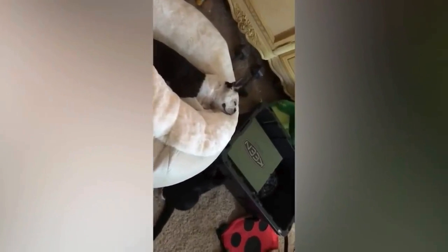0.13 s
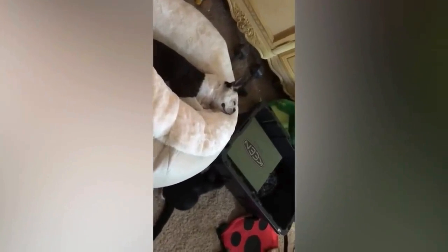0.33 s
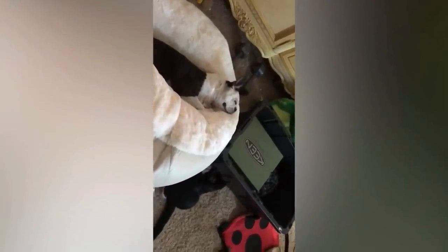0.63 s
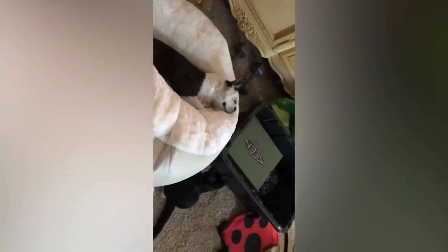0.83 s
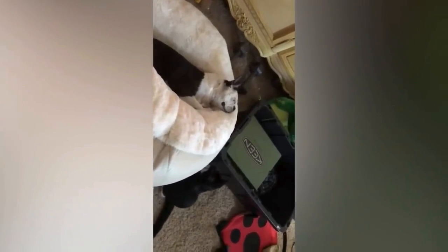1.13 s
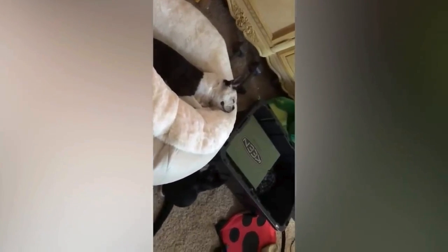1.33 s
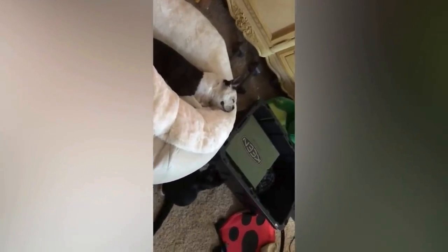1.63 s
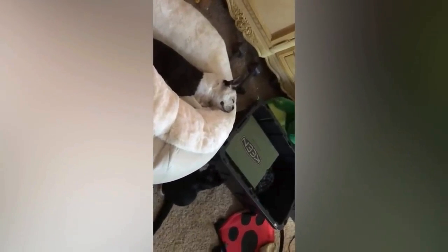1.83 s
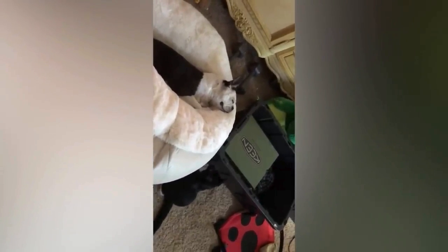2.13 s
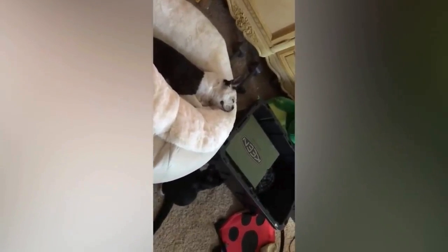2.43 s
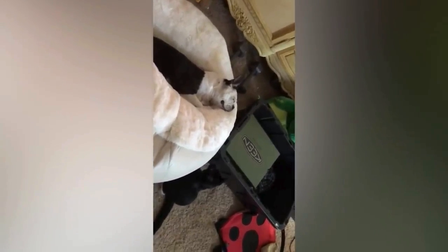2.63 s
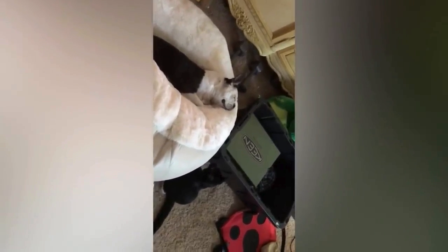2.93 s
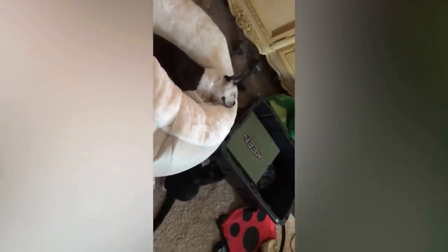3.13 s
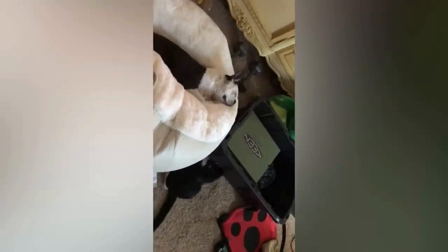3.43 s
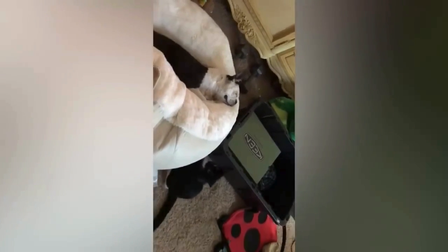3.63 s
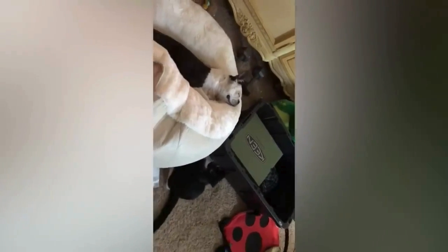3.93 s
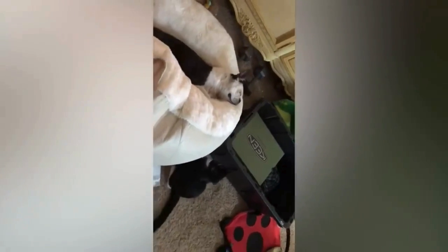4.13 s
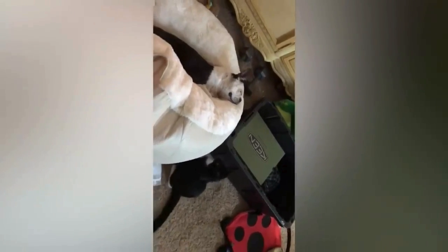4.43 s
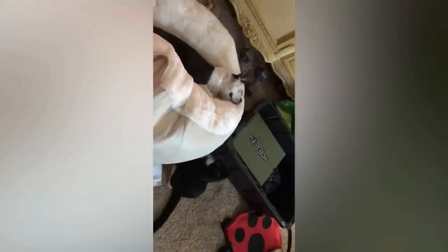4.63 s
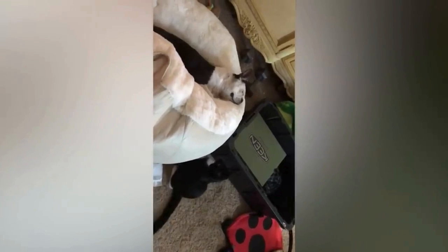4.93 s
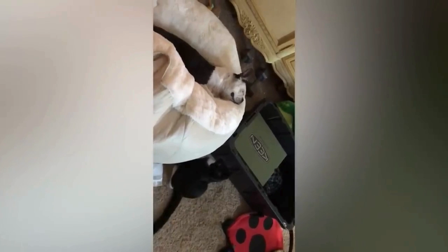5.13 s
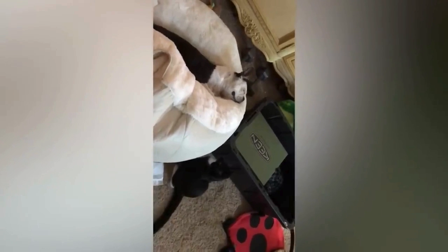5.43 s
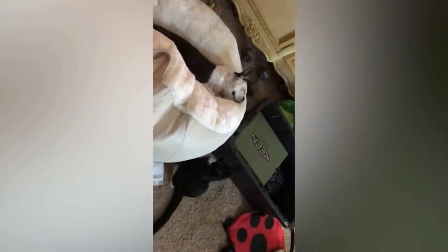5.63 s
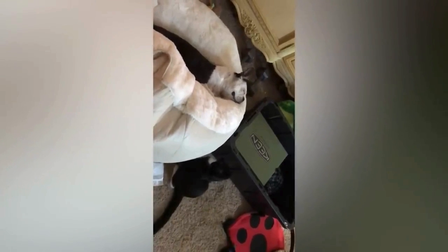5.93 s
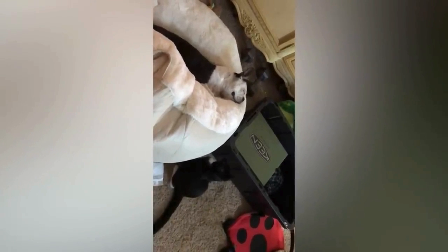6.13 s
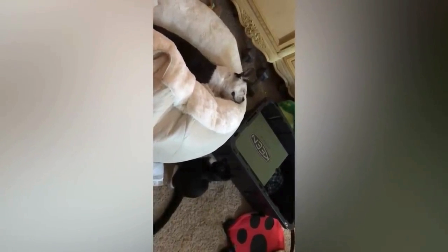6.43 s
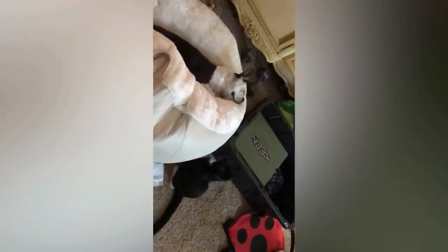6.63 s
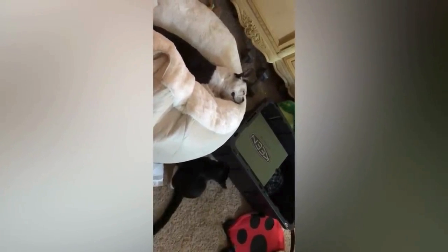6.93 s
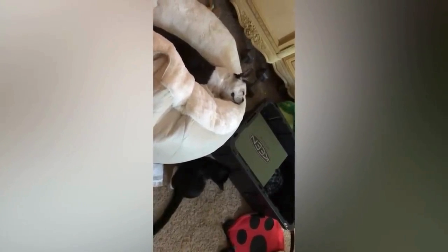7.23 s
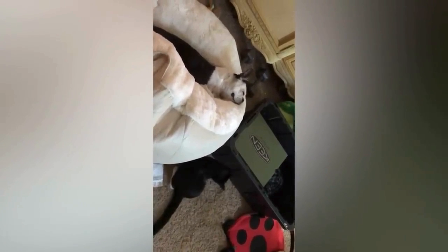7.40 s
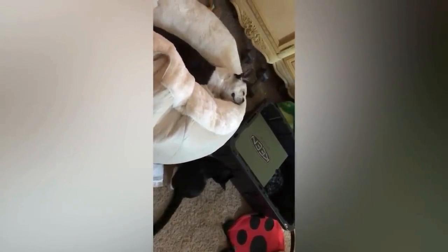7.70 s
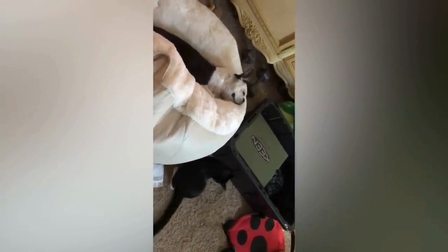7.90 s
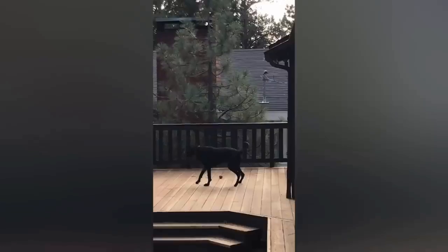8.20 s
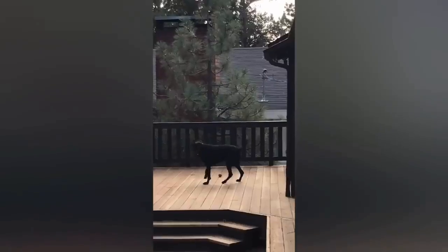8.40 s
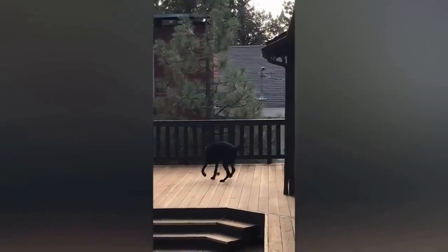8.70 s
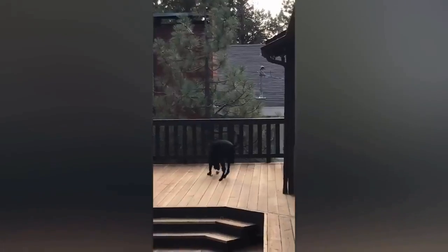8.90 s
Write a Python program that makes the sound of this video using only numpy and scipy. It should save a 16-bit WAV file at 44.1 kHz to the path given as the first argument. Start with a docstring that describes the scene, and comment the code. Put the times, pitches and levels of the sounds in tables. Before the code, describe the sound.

In a hushed room with a faint wavering hum, a little dog sleeps nearby, giving four evenly spaced snores that swell, rattle and fade. Tiny nose whistles and slight rustling come in the pauses. The last second switches abruptly outdoors, where soft gusts bump the microphone and a collar tag ticks against a distant wash of noise.

```python
"""A quiet bedroom, where a small dog snores four times. Its soft palate slaps about fifty times a
second, each slap rings the nose and throat, and air hisses through the gap. Faint nose whistles and
soft rustles fall between the snores, and a hum wavers behind. Then the scene cuts to a yard: ticks
of a collar tag, wind on the microphone, a faint far tone and a distant wash."""
import sys
import numpy as np
from scipy import signal
from scipy.io import wavfile
from scipy.ndimage import uniform_filter1d

SR = 44100
rng = np.random.default_rng(int(sys.argv[2]) if len(sys.argv) > 2 else 0)


def materialize(psi):
    """Save the field psi as 16-bit PCM at rate SR to the path in sys.argv[1].

    A 1-D psi becomes a single channel; in a 2-D psi each row is a channel.
    """
    bounded = np.clip(np.atleast_2d(psi).T, -1, 1)
    quanta = np.round(bounded * 32767).astype(np.int16)
    wavfile.write(sys.argv[1], SR, quanta)


N = 399546

# One list a snore, from first slap to last. Each row: time in seconds, slaps per second.
FLUTTER_CURVES = [
    [(0.044, 32.6), (0.073, 43.8), (0.243, 58.0), (0.372, 47.4), (0.599, 53.8), (0.724, 47.7),
     (0.724, 38.7), (0.825, 33.5)],
    [(2.213, 32.0), (2.246, 49.4), (2.371, 62.1), (2.43, 62.7), (2.538, 47.2), (2.662, 54.2), (2.785, 45.5),
     (2.85, 35.7)],
    [(4.224, 17.2), (4.266, 47.4), (4.434, 56.3), (4.5, 54.4), (4.555, 46.8), (4.647, 51.7), (4.835, 43.9),
     (4.914, 31.7)],
    [(6.272, 40.0), (6.348, 43.5), (6.448, 55.2), (6.537, 45.0), (6.632, 44.9), (6.795, 52.0),
     (6.928, 46.0), (7.0, 29.8)],
]
# Each row: full effort in dB, attack in seconds, nose ring drift in dB per second, muzzle opening time
# and catch time in seconds, surge at the catch in dB, mouth opening time in seconds, open rattle and
# sinus ring in relative dB, damping factor of the upper nose, start of the fade in seconds.
BREATHS = [(-38, 0.072, 0.5, 0.26, .46, 2, .42, -18, -24, 1.08, .72),
           (-37.5, 0.05, 1.5, 2.37, 2.58, 1.5, 2.58, -18.5, -20.5, 1.17, 2.816),
           (-38, 0.056, -1.5, 4.41, 4.56, 2.5, 4.6, -20, -18, 1.2, 4.842),
           (-38, 0.073, 0, 6.45, 6.62, 0.9, 6.66, -21, -14.5, 1.13, 6.926)]
def snoring():
    """The sleeping dog, one snore a breath."""
    out = np.zeros(N)
    for flutter, breath in zip(FLUTTER_CURVES, BREATHS):
        add(out, *snore(flutter, *breath))
    return out


def snore(flutter, full_db, attack_s, drift_db, muzzle_s, catch_s, surge_db,
          mouth_s, open_db, sinus_db, damping, fade_s):
    """One breath swells, catches and fades, driving the palate and airways. Returns start and sound."""
    lead_s, tail_s, lead_db_per_s, attack_db = .06, .12, 140, -21  # faint air before the first slap
    fade_db_per_s, knee_s = -250, .018
    start = max(flutter[0][0] - lead_s, 0)
    t = np.arange(start, flutter[-1][0] + tail_s, 1 / SR)
    age = t - flutter[0][0]
    catch = bump(t, catch_s, spread_s=.078)
    muzzle, mouth = opening(t, muzzle_s, spread_s=.043), opening(t, mouth_s, spread_s=.0079)
    effort_db = attack_db * np.exp(-np.maximum(age, 0) / attack_s) + lead_db_per_s * np.minimum(age, 0)
    effort_db += surge_db * catch + fade_db_per_s * knee_s * np.logaddexp(0, (t - fade_s) / knee_s)
    slaps, puffs = palate(t, flutter)
    crisp = .33 + .29 * catch + .1 * mouth  # share of slap in the air noise
    air = crisp * slaps + np.sqrt(1 - crisp ** 2) * puffs
    # Balance against the nose ring. Taking off a share of the effort makes a layer swing less.
    chest_db = -11.5 + 4 * age - .39 * effort_db
    rasp_db = -28 + 12.5 * muzzle + 4.5 * age - .032 * effort_db
    rattle_db = -25 * (1 - mouth) + open_db * mouth - .017 * effort_db
    hiss_db = -26.5 + 3.5 * catch + .5 * age - .22 * effort_db
    stream_db = -31.5 - .22 * effort_db
    sound = (nose_ring(slaps, puffs, mouth, drift_db * age, sinus_db, damping)
             + amp(chest_db) * chest_thrum(slaps)
             + amp(rasp_db) * muzzle_rasp(slaps, puffs)
             + amp(rattle_db) * mouth_rattle(air)
             + amp(hiss_db) * nostril_hiss(air)
             + amp(stream_db) * nostril_stream(mouth))
    return start, amp(full_db + effort_db) * sound * signal.windows.tukey(len(t), .04)


def palate(t, flutter):
    """The soft palate slaps once a cycle; air rushes as the gap closes and just after each slap."""
    times, rates = np.transpose(flutter)
    turns = np.cumsum(np.interp(t, times, rates)) / SR
    turns = turns - np.interp(times[0], t, turns) + 10.04  # lines a cycle up with the first slap
    cycle, phase = turns.astype(int), turns % 1
    strength = amp(1.36 * rng.standard_normal(80))[cycle]  # no two slaps alike
    fluttering = abs(t - np.clip(t, times[0], times[-1])) < .003
    slaps = unit_rms(np.diff(cycle, prepend=cycle[0]) * strength * fluttering)
    airflow = .15 + strength * (np.exp(-phase / .19) + .32 * np.exp((phase - 1) / .048))
    return slaps, unit_rms(airflow * rng.standard_normal(len(t)))


# The honk of nose and throat, sinus and jaw. Each row: pitch and width in Hz, relative dB, polarity.
NOSE_MODES = [(304, 57, -13, -1), (391, 91, -22, -1), (622, 19, -8, 1), (698, 54, 0, 1),
              (986, 309, -22, -1), (490, 50, -24, -1), (1050, 50, -23, 1)]
SINUS_MODES = [(865, 110, 0, 1)]
JAW_MODES = [(428, 62, 0, -1)]
def nose_ring(slaps, puffs, mouth, nose_db, sinus_db, damping):
    """Slaps ring the nose, throat and sinus, and the jaw once the mouth opens; soft tissue dulls it."""
    upper_nose_hz, flesh_hz, jaw_db = 650, 1550, -24
    modes = [(hz, width * (damping if hz > upper_nose_hz else 1), db, polarity)
             for hz, width, db, polarity in NOSE_MODES]
    nose = amp(nose_db) * unit_rms(cavity(slaps + .15 * puffs, modes))
    sinus = amp(sinus_db) * unit_rms(cavity(slaps, SINUS_MODES))
    jaw = amp(jaw_db) * mouth * unit_rms(cavity(slaps, JAW_MODES))
    return signal.lfilter(*signal.butter(2, flesh_hz, fs=SR), nose + sinus + jaw)


# The low body of the snore. Each row: pitch and width in Hz, relative dB, polarity.
CHEST_MODES = [(57, 5.7, -5.5, -1), (135.6, 39, 1, 1)]
def chest_thrum(slaps):
    """The slaps thump through the chest."""
    return unit_rms(cavity(slaps, CHEST_MODES))


# Midrange grit. Each row: pitch and width in Hz, relative dB, polarity.
MUZZLE_MODES = [(1110, 100, -12, -1), (1323, 89, -0.5, 1), (1630, 300, -5, -1), (1882, 194, -1, 1)]
def muzzle_rasp(slaps, puffs):
    """Slaps, puffs and steady air ring the muzzle, with the top rolled off."""
    rasp = cavity(slaps + .6 * puffs + .6 * rng.standard_normal(len(slaps)), MUZZLE_MODES)
    return unit_rms(signal.lfilter(*signal.butter(4, 2100, fs=SR), rasp))


# The bright edge. Each row: pitch and width in Hz, relative dB, polarity.
MOUTH_MODES = [(3030, 590, 15.5, 1), (3690, 1660, 5.5, -1), (4840, 1300, 8.5, 1), (5340, 680, 9, 1)]
def mouth_rattle(air):
    """Pulsing air rings the mouth, with the lows cut away."""
    return unit_rms(signal.lfilter(*signal.butter(4, 2750, "high", fs=SR), cavity(air, MOUTH_MODES)))


# The sizzle on top. Each row: pitch and width in Hz, relative dB, polarity.
HISS_BANDS = [(7250, 720, 4, 1), (8670, 570, -2.5, -1), (9370, 850, 3.5, 1), (11300, 610, -14, -1),
              (15050, 600, -9, 1)]
def nostril_hiss(air):
    """Each pulse hisses through the nostrils, doubled as the palate bounces once more."""
    rebound = np.roll(air, round(.0035 * SR))
    return unit_rms(cavity(air + .8 * rebound, HISS_BANDS))


# A thin, smooth breath. Each row: pitch and width in Hz, relative dB, polarity.
STREAM_BANDS = [(5400, 500, 0, 1)]
def nostril_stream(mouth):
    """Steady air flows through the nostrils until the mouth opens."""
    return (1 - mouth) * unit_rms(cavity(rng.standard_normal(len(mouth)), STREAM_BANDS))


# Each row: start in seconds, length in seconds, pitch in Hz, level in dB.
NOSE_WHISTLES = [(1.951, 0.176, 1457, -76), (5.772, 0.1, 1376, -79.5)]
def nose_whistles():
    """Air whistles faintly in the nose before a breath."""
    out = np.zeros(N)
    for s, length, hz, db in NOSE_WHISTLES:
        air = unit_rms(resonate(rng.standard_normal(9000), hz, width_hz=32))[:round(length * SR)]
        add(out, s, amp(db) * air * signal.windows.tukey(len(air), .5))
    return out


# Each row: time in seconds, level in dB, length in seconds.
SOFT_RUSTLES = [(3.057, -71.5, 0.078), (3.254, -65.5, 0.074)]
def rustles():
    """Brief, soft swells of midrange noise."""
    out = np.zeros(N)
    for s, db, length in SOFT_RUSTLES:
        rub = noise_band(9000, hz=1730, width_hz=1700)[:round(length * SR)]
        add(out, s - length / 3, amp(db) * rub * np.hanning(len(rub)))
    return out


# Early reflections. Each row: delay in seconds, level against the direct sound in dB, polarity.
REFLECTIONS = [(.00773, -12, 1), (.01005, -11, 1), (.01238, -20, 1), (.01778, -18, -1), (.02194, -18, 1),
               (.03044, -20, 1)]
def room_echo(x):
    """Sound bounces off bed, floor and walls, then dies in a short tail."""
    tail_db, decay_s = -15, .3
    t = np.arange(SR // 2) / SR
    tail = rng.standard_normal(len(t)) * amp(-60 * t / decay_s) * (t > .02)
    taps = amp(tail_db) * tail / np.linalg.norm(tail)
    taps[0] = 1
    for s, db, polarity in REFLECTIONS:
        taps[round(s * SR)] += polarity * amp(db)
    return signal.fftconvolve(x, taps / np.linalg.norm(taps))[:N]


# Ticks of the tag. Each row: start in seconds, peak level in dB.
TAG_TICKS = [(8.2694, -60.5), (8.3733, -60), (8.995, -43)]
# Its bright ring. Each row: pitch and width in Hz, relative dB, polarity.
TAG_MODES = [(4600, 1000, 4.5, 1), (5400, 160, 11, -1), (6100, 650, 1.5, 1), (8400, 1100, -11, -1),
             (10200, 880, -8, 1), (12300, 1200, -7, -1)]
def collar_tag():
    """The tag knocks, then rattles loosely for a moment."""
    out, t = np.zeros(N), np.arange(4000) / SR
    knock, rattle = amp(-60 * t / .0093), .25 * amp(-60 * t / .37)
    for s, db in TAG_TICKS:
        jingle = cavity(rng.standard_normal(len(t)) * (knock + rattle), TAG_MODES)
        add(out, s, amp(db) * jingle / abs(jingle).max())
    return out


# Each row: centre and half width in seconds, rumble level in dB, flapping level in dB.
BUFFETS = [(8.175, 0.023, -48, -64), (8.28, 0.045, -60, -61), (8.36, 0.024, -58, -63),
           (8.5, 0.012, -60, -68), (8.635, 0.029, -54, -72), (8.76, 0.013, -59, -65),
           (8.98, 0.059, -70, -64.5)]
def wind():
    """Wind buffets the microphone: deep rumble and higher flapping, both faint in the lulls."""
    t = np.arange(N) / SR
    rumble = amp(-68) + sum(amp(db) * bump(t, s, spread) for s, spread, db, _ in BUFFETS)
    flapping = amp(-67.5) + sum(amp(db) * bump(t, s, spread) for s, spread, _, db in BUFFETS)
    return rumble * noise_band(N, hz=57.4, width_hz=30) + flapping * noise_band(N, hz=172, width_hz=150)


# Each row: time in seconds, pitch in Hz, level in dB.
FAR_TONE_CURVE = [(8.23, 1194, -73), (8.27, 1320, -65), (8.31, 1325, -63), (8.34, 1300, -78)]
def far_tone():
    """A faint, breathy tone slides up and fades in the distance."""
    t = np.arange(N) / SR
    s, hz, db = np.transpose(FAR_TONE_CURVE)
    tone = unit_rms(resonate(rng.standard_normal(N), np.interp(t, s, hz), width_hz=30))
    return tone * amp(np.interp(t, s, db, left=-120, right=-120))


# The fader ride on the hum. Each row: time in seconds, level in dB.
HUM_LEVELS = [(0, -62), (1.1, -85), (2, -70.5), (3, -79.5), (3.55, -70.5), (3.68, -65.5), (4.15, -68),
              (5.1, -78.5), (6.1, -75), (7.1, -75.5), (8.2, -69)]
def hum(hz=143.8, width_hz=17):
    """A low tone wavers as narrow noise beats against it."""
    t = np.arange(N) / SR
    narrow = resonate(rng.standard_normal(N), hz, width_hz)
    waver = unit_rms(resonate(narrow, hz, width_hz))
    return (np.sin(2 * np.pi * hz * t) + .62 * waver) * amp(np.interp(t, *np.transpose(HUM_LEVELS)))


# The colour of the room's hush. Each row: frequency in Hz, relative level in dB.
ROOM_SPECTRUM = [(12, -60), (20, -43), (53, 2.5), (74, 4.5), (93, -6), (137, -5.5), (176, -11), (364, -13),
                 (509, -18), (915, -18.5), (995, -22.5), (8780, -33), (10100, -38.5), (11600, -33.5),
                 (15800, -59)]
def room_tone():
    """A dark, nearly even hush."""
    return amp(-67.5) * wash(ROOM_SPECTRUM, patchy_db=.3)


# The colour of the open air. Each row: frequency in Hz, relative level in dB.
YARD_SPECTRUM = [(88, -18), (150, -1), (254, -17), (353, 2), (492, -6.5), (598, 1), (1180, -1), (5000, -27),
                 (11500, -31), (12700, -41), (15800, -43)]
def distant_wash():
    """A gently shifting wash beyond the yard."""
    return amp(-58.5) * wash(YARD_SPECTRUM, patchy_db=1.5)


def wash(spectrum, patchy_db):
    """Noise of a given spectrum with drifting louder and softer patches."""
    frames, hz = N // 1024 + 5, np.fft.rfftfreq(4096, 1 / SR)
    real, imag, patches = rng.standard_normal((frames, 2049, 3)).T
    patches = uniform_filter1d(patches, size=40, axis=0)  # smooth across frequency
    patches = unit_rms(uniform_filter1d(patches, size=3, axis=1))  # and across time
    points_hz, db = np.transpose(spectrum)
    colour_db = np.interp(np.log(hz + 1), np.log(points_hz + 1), db)[:, None]
    bins = (real + 1j * imag) * amp(colour_db + patchy_db * patches)
    return unit_rms(signal.istft(bins, nperseg=4096, noverlap=3072)[1][:N])


def cavity(x, modes):
    """Resonances side by side, each filtered twice for steep flanks."""
    out = np.zeros(len(x))
    for hz, width, db, polarity in modes:
        ring = signal.lfilter(*signal.iirpeak(hz, hz / width, SR), x)
        out += polarity * amp(db) * signal.lfilter(*signal.iirpeak(hz, hz / (3 * width), SR), ring)
    return out


def noise_band(samples, hz, width_hz):
    """One band of noise at rms 1."""
    return unit_rms(cavity(rng.standard_normal(samples), [(hz, width_hz, 0, 1)]))


def resonate(x, hz, width_hz):
    """A resonance that can glide: shifts hz down to zero, smooths, and shifts back."""
    turn = np.exp(2j * np.pi * np.cumsum(hz * np.ones(len(x))) / SR)
    pole = np.exp(-np.pi * width_hz / SR)
    return 2 * (turn * signal.lfilter([1 - pole], [1, -pole], x / turn)).real


def opening(t, s, spread_s):
    """A smooth step from 0 to 1 around time s."""
    return .5 + .5 * np.tanh((t - s) / spread_s)


def bump(t, s, spread_s):
    """A bell of height 1 around time s."""
    return np.exp(-((t - s) / spread_s) ** 2)


def amp(db):
    """Decibels to gain."""
    return 10 ** (np.asarray(db) / 20)


def unit_rms(x):
    """Scales to rms 1."""
    return x / np.sqrt(np.mean(x ** 2) + 1e-20)


def add(mix, s, sound):
    """Mixes a sound in at s seconds."""
    part = mix[round(s * SR):][:len(sound)]
    part += sound[:len(part)]


def scene():
    """The bedroom, then a hard cut to the yard."""
    cut_s, crossfade_s = 8.166, .0023
    close_sounds = snoring() + nose_whistles() + rustles()
    bedroom = hum() + room_echo(close_sounds) + room_tone()
    yard = wind() + far_tone() + distant_wash() + collar_tag()
    outside = np.clip((np.arange(N) / SR - cut_s) / crossfade_s, 0, 1)
    return ((1 - outside) * bedroom + outside * yard)[None]


def record(dry):
    """A steep low-pass takes off the very top of the treble."""
    edge_hz = 15900
    return signal.oaconvolve(dry, signal.firwin(511, edge_hz, window=("kaiser", 9), fs=SR)[None], "same")


dry = scene()
out = record(dry)
materialize(out)
```